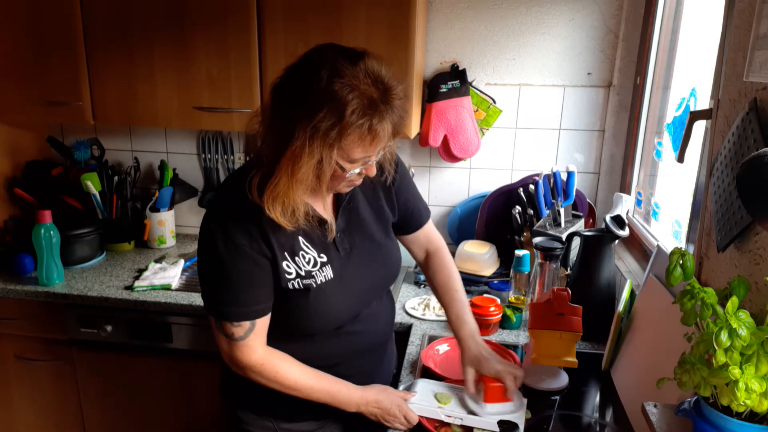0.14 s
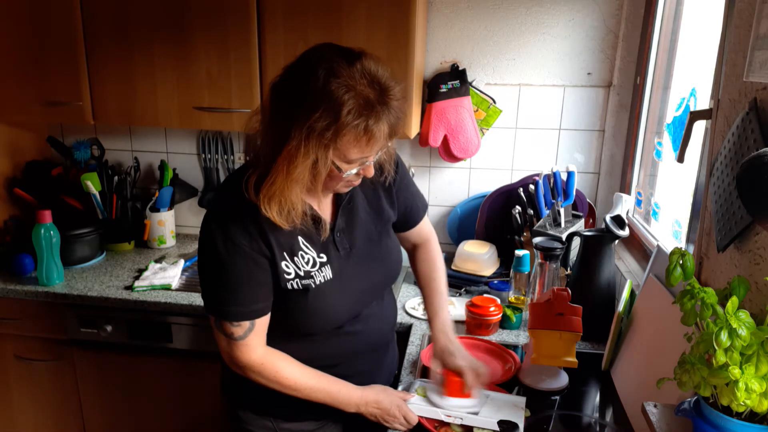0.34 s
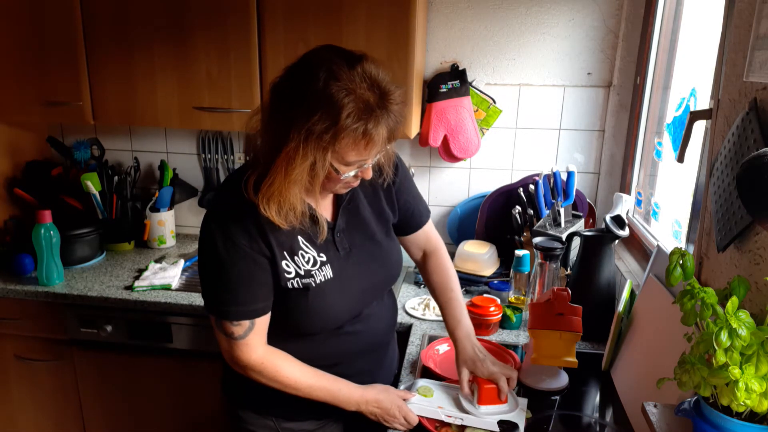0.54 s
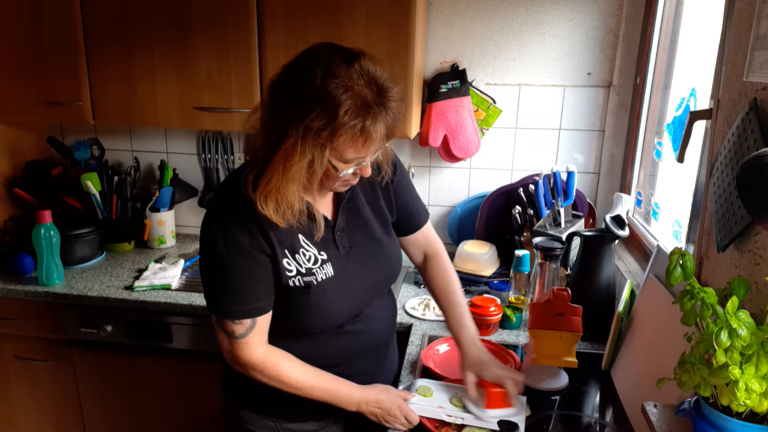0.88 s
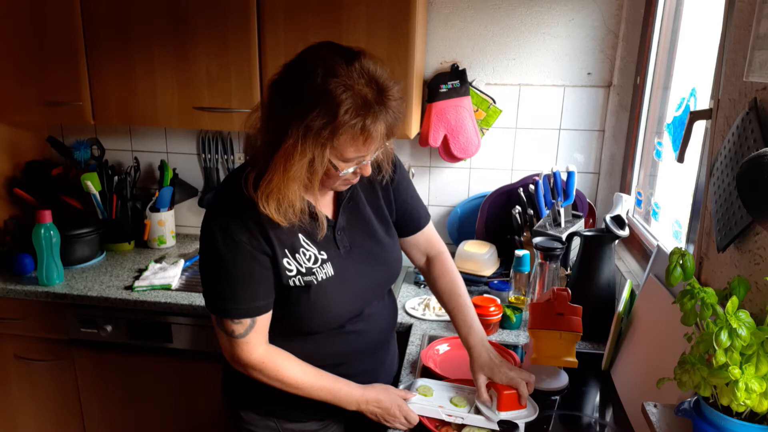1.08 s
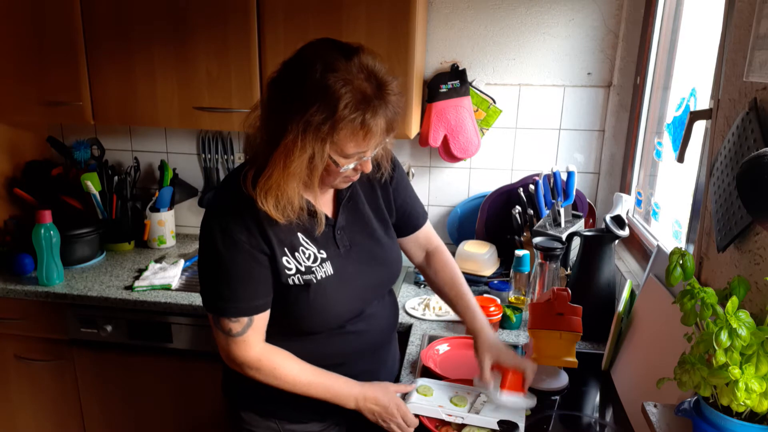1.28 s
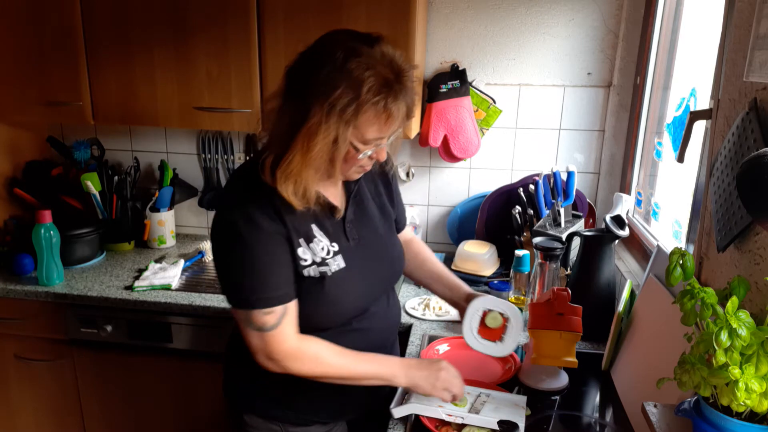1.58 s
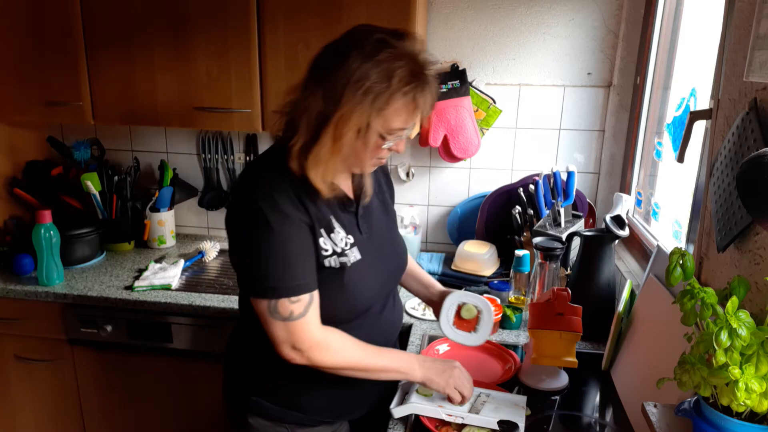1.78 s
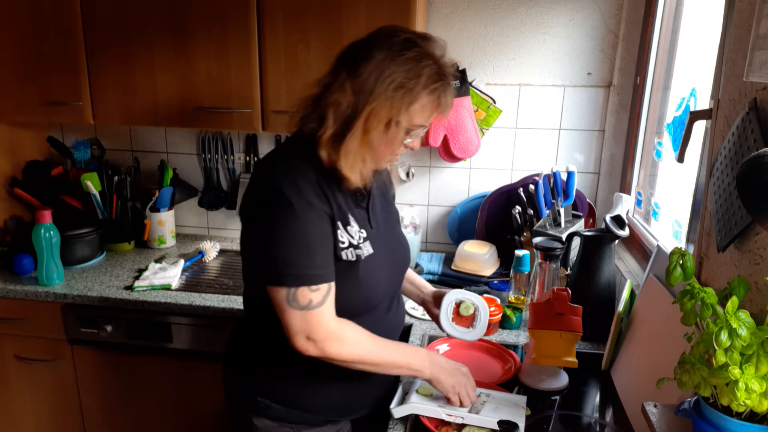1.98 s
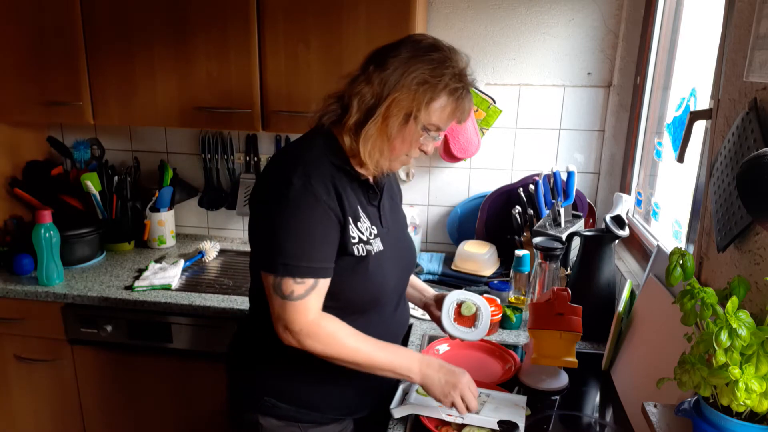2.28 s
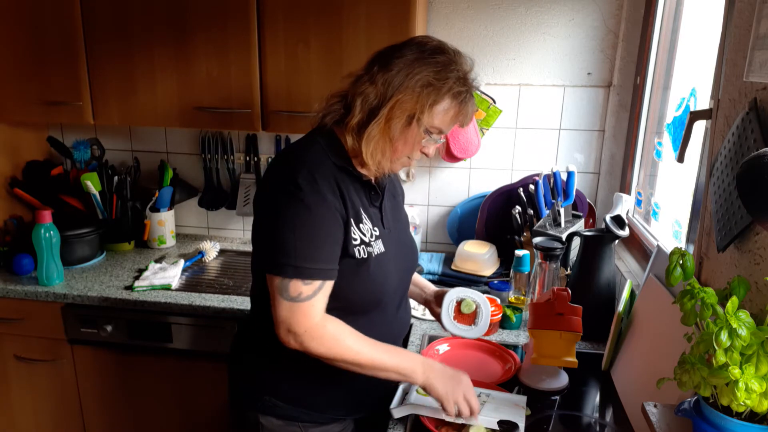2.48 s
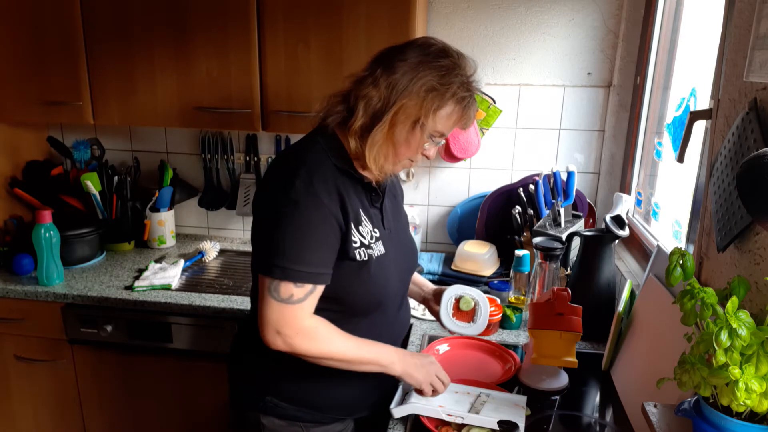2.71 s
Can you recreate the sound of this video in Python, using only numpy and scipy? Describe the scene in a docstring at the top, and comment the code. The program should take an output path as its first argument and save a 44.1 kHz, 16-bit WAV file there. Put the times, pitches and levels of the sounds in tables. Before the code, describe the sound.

Vegetable slicing on a mandoline, with plastic clacks, short scrapes and dull thuds.

```python
"""A small tiled kitchen, a stereo microphone close to a mandoline slicer that rests on a bowl.
A vegetable end in a plastic holder is pushed to and fro: the holder clacks on the rails and squeaks,
the blade rasps through the flesh, bowl and worktop thud. Then fingers pick at the slicer with a few
clicks. Far behind, over the room's rumble and hiss, a motor hums, slowly rising, and something
electrical whines faintly. The whole scene leans a little to the right."""
import sys
import numpy as np
from scipy import signal
from scipy.fft import rfft, irfft, next_fast_len
from scipy.io import wavfile
from scipy.ndimage import uniform_filter1d

SR = 44100
rng = np.random.default_rng(int(sys.argv[2]) if len(sys.argv) > 2 else 0)


def store_wav(level_fs):
    """Save 16-bit WAV to argv[1]."""
    pcm = np.round(np.clip(np.atleast_2d(level_fs), -1, 1) * 32767)
    wavfile.write(sys.argv[1], SR, pcm.T.astype(np.int16))


N = 125685
T = np.arange(N) / SR
FFT_SIZE = next_fast_len(2 * N)
HZ = np.maximum(np.arange(FFT_SIZE // 2 + 1) * SR / FFT_SIZE, 1)

# Room tone, its low and its high part: f/Hz, relative level/dB
RUMBLE_SPECTRUM = [(20, -26), (35, 14.5), (50, -3.5), (100, 1.5), (160, -9.5), (240, -15), (400, -25),
                   (1000, -45)]
HISS_SPECTRUM = [(200, 8.5), (500, -2), (1200, -1), (3000, -6.5), (6000, -5.5), (8300, -15.5), (9800, -9),
                 (11000, 9), (13000, 2.5), (15500, -0.5)]
# Pitch of the distant motor: t/s, f/Hz
MOTOR_PITCH = [(0, 58.6), (0.85, 61.5), (1.65, 64.82), (2.2, 65.04), (2.85, 66.47)]
# Its first three harmonics: t/s, then level/dB of each
MOTOR_HARMONICS = [(0, -55.5, -67, -75), (0.7, -86, -68.5, -70.5), (1.05, -77.5, -71, -65),
                   (1.5, -74.5, -78.5, -73.5), (1.751, -83, -71, -88), (2.119, -65.5, -57.5, -76),
                   (2.382, -72, -70, -80.5), (2.55, -62, -62.5, -84.5), (2.85, -63, -54.5, -95)]
# Decay of the kitchen: f/Hz, t60/s
KITCHEN_DECAY = [(200, 0.35), (1000, 0.22), (4000, 0.24), (8000, 0.22), (15000, 0.21)]
# Diffuse sound at the microphone: f/Hz, left-right coherence (0 to 1)
COHERENCE = [(100, 0.88), (300, .85), (600, 0.18), (1200, 0.099), (4000, .05)]
# Stereo balance: f/Hz, left minus right/dB
BALANCE = [(60, -4), (150, -6), (300, -3.5), (500, -4.5), (1000, 1), (2000, -3), (4500, -3), (12000, -4.5)]
# Modes of the three bodies: f/Hz, relative level/dB, t60/s
WORKTOP_MODES = [(44, -2.5, .2), (53, 1.5, 0.21), (74.2, 0.5, 0.37), (96, -3, .15)]
BOWL_MODES = [(115.4, -3.5, 0.18), (151.6, 5, 0.19), (177, -6.5, .08), (208.2, -6, 0.16), (345, -10.5, 0.2),
              (463, -19.5, .1), (535.4, -15.5, 0.13), (694, -15, 0.073)]
SLICER_MODES = [(850, 3.5, 0.05), (914, 5.5, 0.061), (956, 5.5, 0.074), (1013, 6.5, 0.031), (1116, 4, 0.05),
                (1142, 1.5, 0.032), (1270, 1, 0.06), (1500, -13, 0.22), (1605, -4, 0.017),
                (1884, -9.5, 0.06), (2083, -5, 0.05)]
# The holder's weight rocks the slicer on the worktop: t/s, level/dB
ROCKING_PUSHES = [(0.135, -13.5), (0.302, -1), (0.358, -4.5), (0.385, -17), (0.482, -21.5), (0.935, -20.5),
                  (1.941, -26.5), (2.215, -26)]
# Stick-slip of plastic, the shortest mere ticks: t/s, length/s, f/Hz, level/dB
PLASTIC_SQUEAKS = [(0.093, 0.0052, 6000, -49.5), (0.1, 0.02, 850, -43.5), (0.149, 0.0064, 2245, -41),
                   (0.215, 0.025, 2190, -47.5), (0.23, 0.022, 1205, -36), (0.229, 0.02, 1660, -43),
                   (1.134, 0.012, 1615, -62.5), (1.134, 0.00085, 5100, -53.5), (2.044, 0.00077, 4600, -40),
                   (2.427, 0.0074, 845, -52), (2.428, 0.034, 1413, -61.5), (2.729, 0.017, 1405, -56)]
# Colour of cracks and rasps: f/Hz, gain/dB
CONTACT_SPECTRUM = [(120, 5), (260, 5), (450, -6), (700, -7), (1200, 3), (2300, 0.5), (3200, -2), (4300, 1),
                    (5600, -3), (7000, -9.5), (9500, -9), (12000, -7), (15500, -12.5)]
# Plastic contacts: t/s, crack/dB, tilt/(dB per octave), slicer ring/dB, bowl knock/dB, worktop boom/dB
PLASTIC_CLACKS = [(0.098, -32, 10, -23, -22, -33), (0.122, -3, -2.5, -17, -11, -11),
                  (0.148, -5, -3, -36, -39, -30), (0.235, -10, -5, -10.5, -17, -32),
                  (0.271, 1, -3.5, -8.5, 1.5, -0.5), (0.340, -12.5, -3.5, -34, -8, -33),
                  (0.781, -28.5, -4, -43, -28.5, -47), (0.838, -11.5, 0.5, -24.5, -15, -21),
                  (0.886, -6.5, -0.5, -24, -23.5, -26), (0.91, -11, -1, -27, -31, -25),
                  (1.134, -22.5, -1, -59, -42, -42), (1.214, -33.5, -1, -45.5, -64, -47),
                  (1.257, -34, 0, -43, -42, -48), (1.720, -18, 4.5, -25, -32.5, -28.5),
                  (1.785, -26, 0, -52, -44, -42), (1.82, -28, -2.5, -35, -38, -31),
                  (1.903, -19, 4, -28, -28, -46), (2.019, -28.5, 0.5, -36, -44, -56),
                  (2.047, -26, 2.5, -32.5, -33, -43), (2.428, -34.5, -8, -36, -13.5, -25),
                  (2.728, -26.5, 9, -15.5, -32.5, -27), (2.737, -21, -4.5, -25, -37, -44),
                  (2.758, -17, 3.5, -26, -57.5, -45), (2.781, -30, -6, -26.5, -38, -26)]
# Sliding strokes: t/s, length/s, first level/dB, last level/dB, tilt/(dB per octave),
# then ring/dB, knock/dB and boom/dB relative to the rasp
STROKES = [(0.0, 0.019, -37, -71.5, 0, -18, -9, 0), (0.086, 0.058, -42, -53, 0, -20, -13.5, -29),
           (0.124, 0.071, -41, -38, 0.3, -13.5, -8, -2.5), (0.218, 0.058, -50.5, -24.5, 1.05, -7, -7, -0.5),
           (0.398, 0.046, -39, -38, 0.24, -20, -7, -12), (0.432, 0.044, -38.5, -44, 0.5, -12, -5, -2.5),
           (0.649, 0.0974, -55.5, -49, -1.6, -23, -9, -9.5), (0.808, 0.038, -50.5, -49, -4, -12, -5.5, -6),
           (0.838, 0.098, -39.5, -48.5, 1, -14, -6.5, -4), (0.988, 0.166, -65.5, -72.5, 4, -33, -4, -12),
           (1.138, 0.11, -56, -90.5, 1.5, -17, -4.5, -21), (1.723, 0.035, -44, -52, -1, -6, -9.5, -13),
           (1.801, 0.11, -88.5, -59, 1.5, 4.5, -36, -5), (1.896, 0.047, -64, -47.5, -2.5, -13.5, -10, 1)]

LEAD = 256  # samples of room for the colouring filter to ring ahead of a contact


def from_db(db):
    """Decibels to gain."""
    return 10 ** (np.asarray(db) / 20)


def unit(x):
    """Scale to an energy of one per channel."""
    return x / np.sqrt(np.sum(x ** 2, axis=-1, keepdims=True) + 1e-20)


def at_hz(points, hz):
    """Read a table on a log-frequency axis."""
    freqs, values = np.transpose(points)
    return np.interp(np.log(hz), np.log(freqs), values)


def coloured(x, gain):
    """Apply a smooth frequency response."""
    return irfft(rfft(x, FFT_SIZE) * gain, FFT_SIZE)[..., :N]


def add(track, s, x, lead=0):
    """Mix x into the track at time s, less a lead in samples."""
    start = int(s * SR) - lead
    x, start = x[..., max(-start, 0):], max(start, 0)
    track[..., start:start + x.shape[-1]] += x[..., :N - start]


def through(x, response):
    """Pass a sound through a body or a room."""
    return signal.fftconvolve(np.atleast_2d(x), np.atleast_2d(response), axes=-1)[:, :N]


def diffuse_noise():
    """Noise from all sides: left and right are alike in the bass and unrelated in the treble."""
    mid, side = rng.standard_normal((2, N))
    alike = at_hz(COHERENCE, HZ)
    return coloured(mid, np.sqrt(1 + alike)) + coloured(side, np.sqrt(1 - alike)) * [[1], [-1]]


def room_tone(spectrum, level_db):
    """Steady background noise all round the microphone."""
    noise = coloured(diffuse_noise(), from_db(at_hz(spectrum, HZ)))
    return from_db(level_db) * np.sqrt(N) * unit(noise)


def motor():
    """A far motor gains speed slowly; its harmonics swell and fade."""
    phase = 2 * np.pi * np.cumsum(np.interp(T, *np.transpose(MOTOR_PITCH))) / SR
    times, *levels = np.transpose(MOTOR_HARMONICS)
    return sum(np.sqrt(2) * from_db(np.interp(T, times, db))
               * np.sin(k * phase + rng.uniform(0, 2 * np.pi)) for k, db in enumerate(levels, 1))


def whine(pitch_hz=11400, swing_hz=124, rate_hz=48.3, throb=0.18, level_db=-80):
    """A thin electrical whistle whose pitch and strength swing at about the mains rate."""
    cycle = 2 * np.pi * rate_hz * T
    tone = np.sin(2 * np.pi * pitch_hz * T + swing_hz / rate_hz * np.sin(cycle))
    return np.sqrt(2) * from_db(level_db) * tone * (1 - throb * np.cos(cycle))


def kitchen_tail(level_db=-2):
    """The tiled room's diffuse tail, which dies sooner in the treble than in the bass."""
    noise, tail = diffuse_noise(), np.zeros((2, N))
    centres = np.log([hz for hz, _ in KITCHEN_DECAY])
    for share, (_, t60) in zip(np.eye(len(centres)), KITCHEN_DECAY):
        band = coloured(noise, np.interp(np.log(HZ), centres, share))
        tail += band * from_db(-60 * T / t60)
    return from_db(level_db) * unit(tail)[:, :SR]


def reflections(count=36, direct_db=-23, early_db=-4.5, decay_s=0.0073, port_lag_s=0.0004):
    """Direct sound and first echoes off tiles and worktop, each echo from its own side."""
    echoes = np.zeros((2, SR // 10))
    jitter, side, sign = rng.random((3, count))
    delay = np.pi * decay_s * (np.arange(count) + jitter) / count
    lags = side * port_lag_s, (1 - side) * port_lag_s  # to the microphone's two ports
    for channel, lag in zip(echoes, lags):
        channel[((delay + lag) * SR).astype(int)] = np.sign(sign - .5) * np.exp(-delay / decay_s)
    return from_db(early_db) * unit(echoes) + from_db(direct_db) * (T[:SR // 10] == 0)


def ringing(modes):
    """Response of a struck body: decaying sines of alternating sign."""
    t = T[:int(SR * max(t60 for _, _, t60 in modes))]
    return unit(sum((-1) ** k * from_db(db - 60 * t / t60) * np.sin(2 * np.pi * hz * t)
                    for k, (hz, db, t60) in enumerate(modes)))


def rocking(push_s=0.011):
    """Soft half-sine pushes of the rocking slicer on the worktop."""
    force = np.zeros(N)
    push = np.sin(np.pi * np.minimum(T[:SR // 20] / push_s, 1))
    for s, db in ROCKING_PUSHES:
        add(force, s, from_db(db) * push / push.sum())
    return force


def squeaks(relative_bandwidth=0.19):
    """Plastic sticks and slips: short swelling tones, unsteady in pitch from cycle to cycle."""
    out = np.zeros(N)
    for s, length, hz, db in PLASTIC_SQUEAKS:
        t = T[:int(length * SR)]
        phase_step = np.sqrt(2 * np.pi * relative_bandwidth * hz / SR)
        wander = phase_step * np.cumsum(rng.standard_normal(SR // 10))[:len(t)]
        wander = uniform_filter1d(wander, int(2 * SR / hz))  # smoothed over two cycles
        swell = np.sqrt(2 * np.abs(np.sin(np.pi * t / length)))
        add(out, s, from_db(db) * swell * np.sin(2 * np.pi * hz * t + wander))
    return out


def clack(snaps_per_s=6000, decay_s=0.00084, spray_db=0.5, top_hz=11400):
    """One touch of plastic crumbles into a dying spray of tiny snaps, softened at the top."""
    t = T[:SR // 50]
    snaps = (rng.random(len(t)) < snaps_per_s / SR) * rng.standard_normal(len(t))
    spray = from_db(spray_db) * unit(snaps * np.exp(-t / decay_s))
    soften = signal.butter(2, top_hz, fs=SR, output="sos")
    return signal.sosfilt(soften, unit((t == 0) + spray))


def rasp(length_s, first_db, last_db, snaps_per_s=8000, spread_db=1.5, edge_s=0.0094):
    """Dense tiny snaps of cut cells and slipping plastic under one stroke."""
    t = T[:int(length_s * SR)]
    chance, size, sign = rng.random((3, SR // 4))[:, :len(t)]
    strength = from_db(spread_db * np.minimum(-np.log(size), 4))
    snaps = (chance < snaps_per_s / SR) * strength * np.sign(sign - .5)
    edges = np.clip(np.minimum(t, length_s - t) / edge_s, 0, 1)
    level = from_db(first_db + (last_db - first_db) * t / length_s)
    return unit(snaps) * np.sqrt(len(t)) * edges * level


def contacts():
    """Clacks and strokes as (time, surface sound, force, tilt, levels of ring, knock and boom)."""
    events = [(s, from_db(crack_db) * clack(), np.ones(1), tilt, levels_db)
              for s, crack_db, tilt, *levels_db in PLASTIC_CLACKS]
    for s, length, first_db, last_db, tilt, *levels_db in STROKES:
        stroke = rasp(length, first_db, last_db)
        events.append((s, stroke, stroke, tilt, levels_db))
    return events


def spot_colour(surface, db_per_octave, patchy_db=0.9, patch_count=30, low_hz=340, size=16384):
    """Each contact meets a spot with its own slope and chance resonances; comes back LEAD samples late."""
    hz = np.maximum(np.arange(size // 2 + 1) * SR / size, 1)
    octaves = np.log2(np.clip(hz, 400, 16000) / 2500)
    centres = np.linspace(octaves[0], octaves[-1], patch_count)
    patches = np.interp(octaves, centres, rng.standard_normal(patch_count))
    gain = from_db(at_hz(CONTACT_SPECTRUM, hz) + db_per_octave * octaves + patchy_db * patches)
    shaped = np.roll(irfft(rfft(surface, size) * gain, size), LEAD)
    thin = signal.butter(3, low_hz, "high", fs=SR, output="sos")  # thin plastic radiates little bass
    return signal.sosfilt(thin, shaped)


def gripped_modes(detune=0.016, spread_db=2):
    """The grip shifts the pitch and level of the slicer's modes anew at each contact."""
    chance = rng.standard_normal((len(SLICER_MODES), 2))
    return [(hz * (1 + detune * bend), db + spread_db * gain, t60)
            for (hz, db, t60), (bend, gain) in zip(SLICER_MODES, chance)]


def slicer(thud_send_db=-26.5, echo_shift_hz=3.1):
    """Close up, each contact cracks and rings with its own echoes; bowl and worktop thud underneath."""
    bright, bowl_force, worktop_force = squeaks(), np.zeros(N), rocking()
    near = through(bright, reflections())
    for s, surface, force, tilt, (ring_db, knock_db, boom_db) in contacts():
        crack = spot_colour(surface, tilt)
        ring = signal.fftconvolve(force, ringing(gripped_modes()))
        ring = np.pad(ring, (LEAD, len(crack)))[:len(crack)]
        contact = crack + from_db(ring_db) * ring
        add(bright, s, contact, LEAD)
        add(near, s, through(contact, reflections()), LEAD)
        add(bowl_force, s, from_db(knock_db) * force)
        add(worktop_force, s, from_db(boom_db) * force)
    thuds = through(bowl_force, ringing(BOWL_MODES)) + through(worktop_force, ringing(WORKTOP_MODES))
    radiated = bright + from_db(thud_send_db) * thuds
    # The moving hand changes the pattern of reflections: the sound swings between two tails.
    turn = 2 * np.pi * echo_shift_hz * T
    tail = sum(through(radiated * share, kitchen_tail()) for share in (np.cos(turn), np.sin(turn)))
    return near + thuds + tail


def scene():
    """Slicer in front, motor, whine and room tone behind, all leaning to the right."""
    sources = slicer() + motor() + whine()
    sources += room_tone(RUMBLE_SPECTRUM, level_db=-66.5) + room_tone(HISS_SPECTRUM, level_db=-73.5)
    return coloured(sources, from_db(at_hz(BALANCE, HZ) * [[.5], [-.5]]))


def record(dry, low_hz=40.1, top_hz=15850):
    """The microphone loses the deep bass; the top is cut steeply."""
    low_cut = signal.butter(4, low_hz, "high", fs=SR, output="sos")
    top_cut = signal.ellip(12, .2, 80, top_hz, fs=SR, output="sos")
    return signal.sosfilt(top_cut, signal.sosfilt(low_cut, dry))


dry = scene()
out = record(dry)
store_wav(out)
```